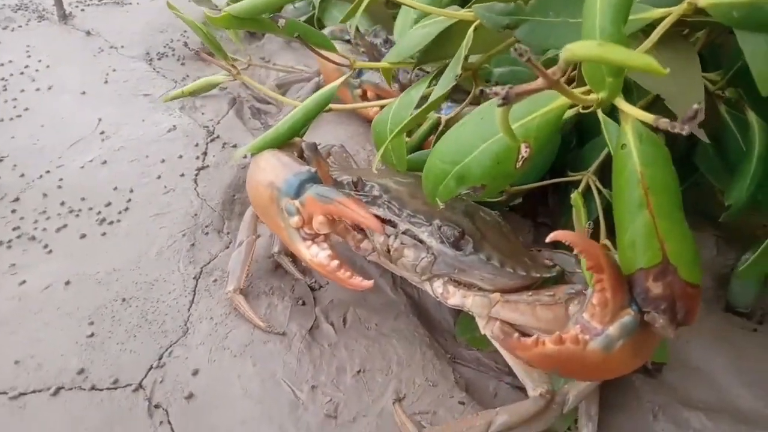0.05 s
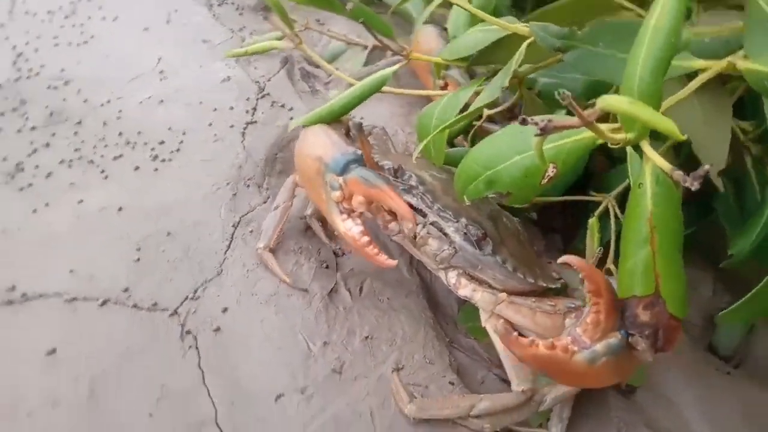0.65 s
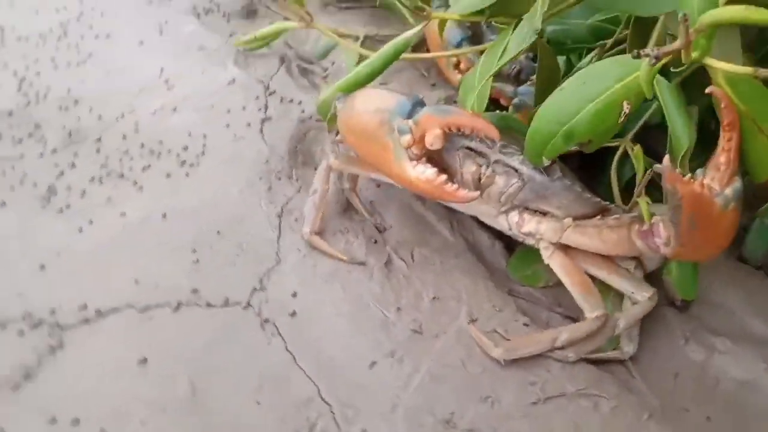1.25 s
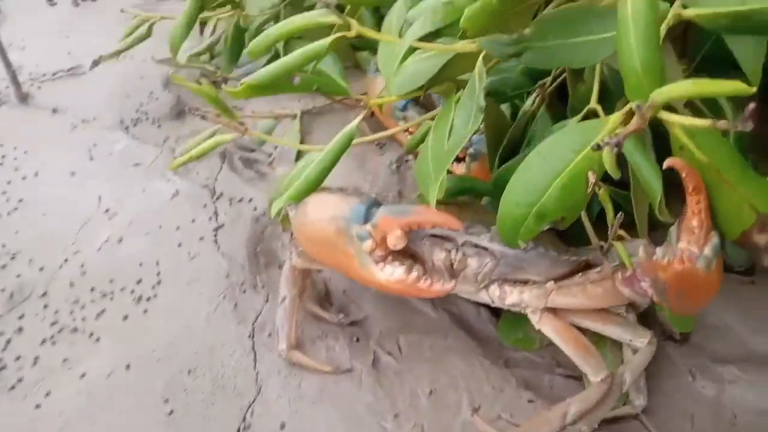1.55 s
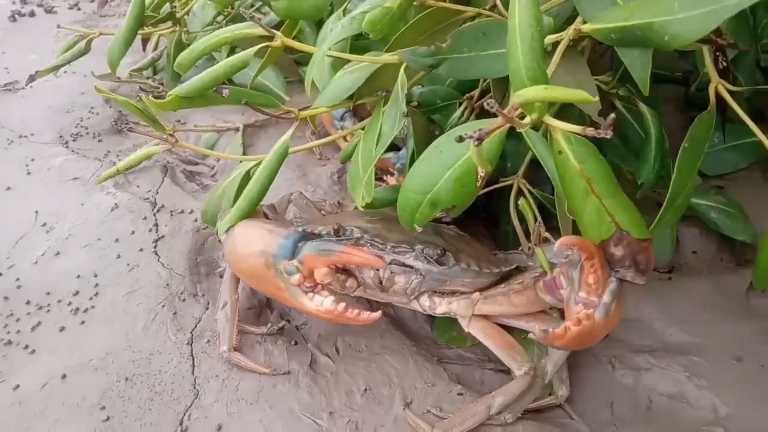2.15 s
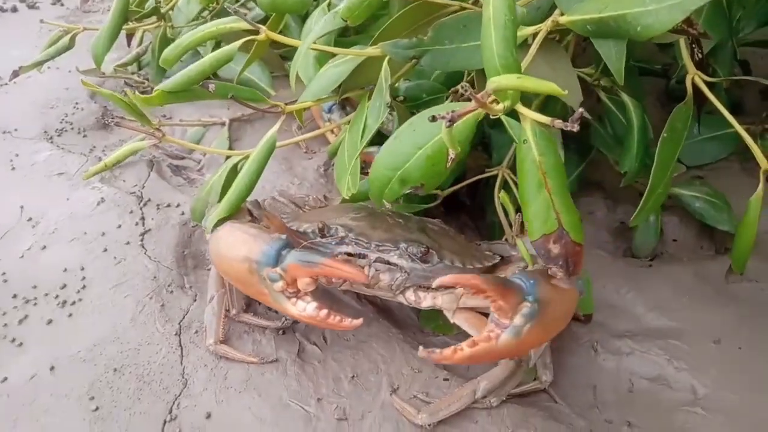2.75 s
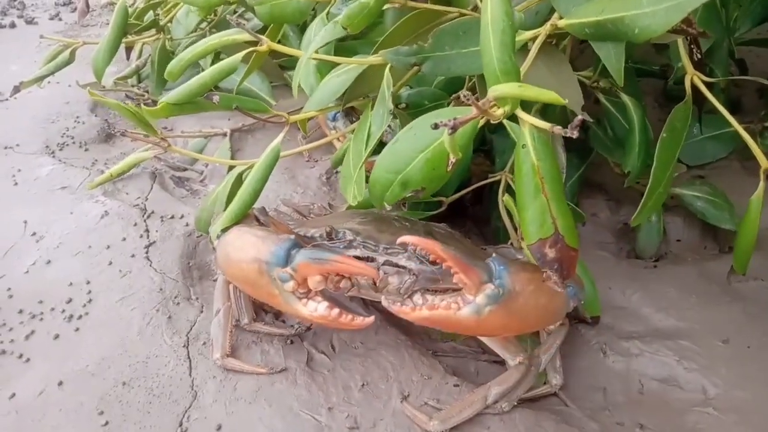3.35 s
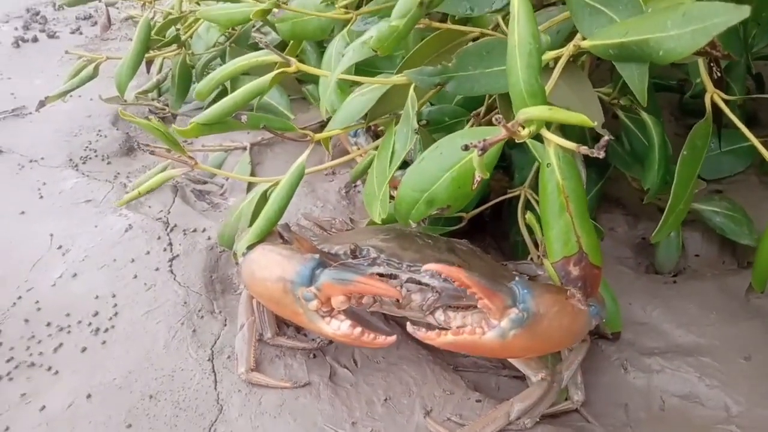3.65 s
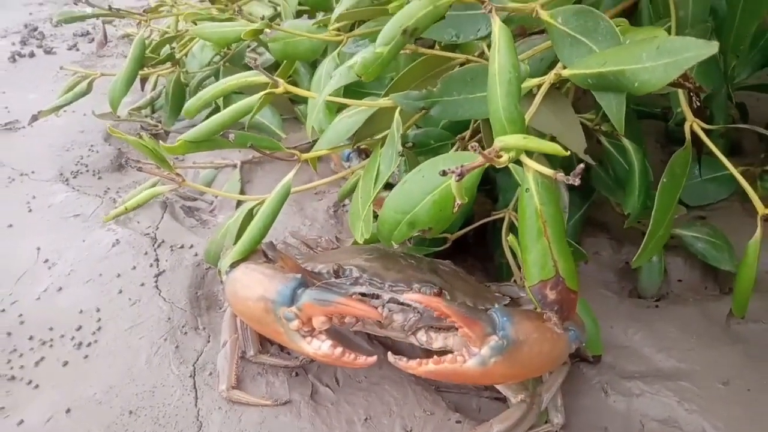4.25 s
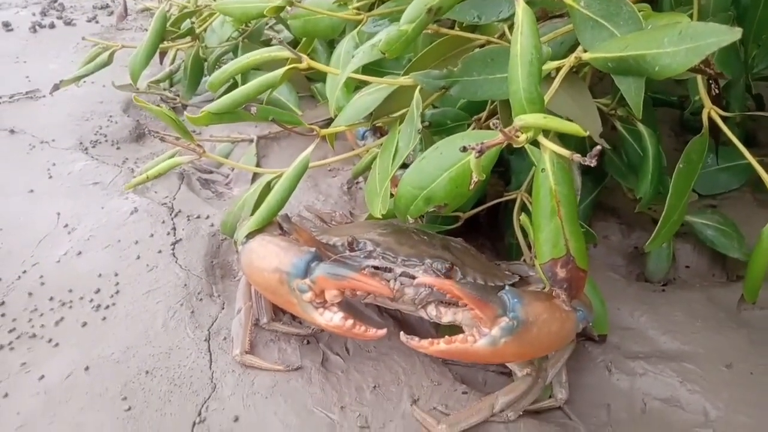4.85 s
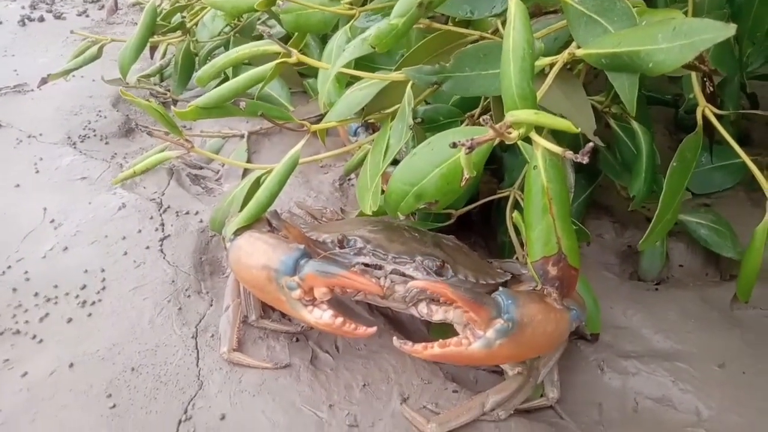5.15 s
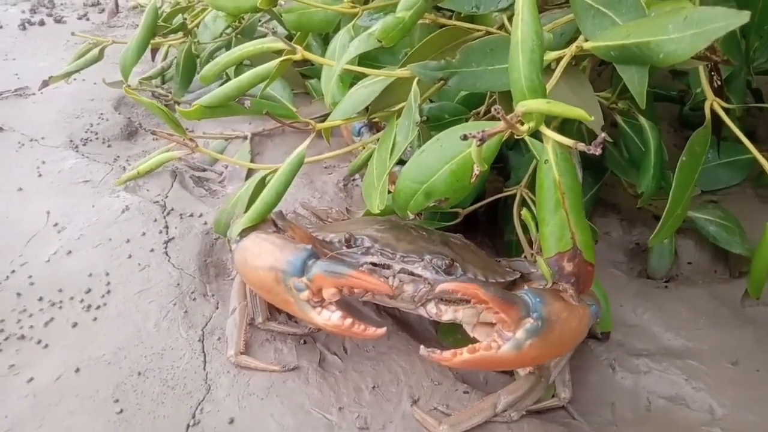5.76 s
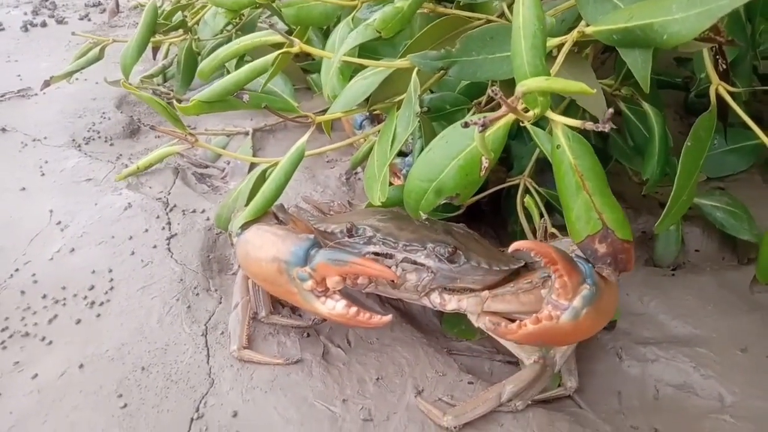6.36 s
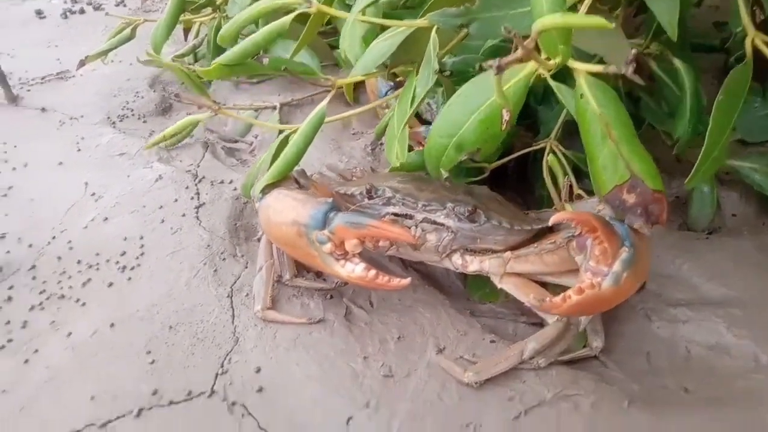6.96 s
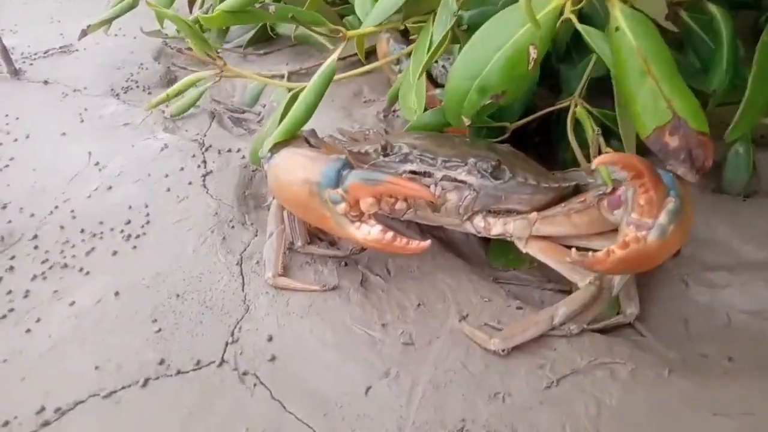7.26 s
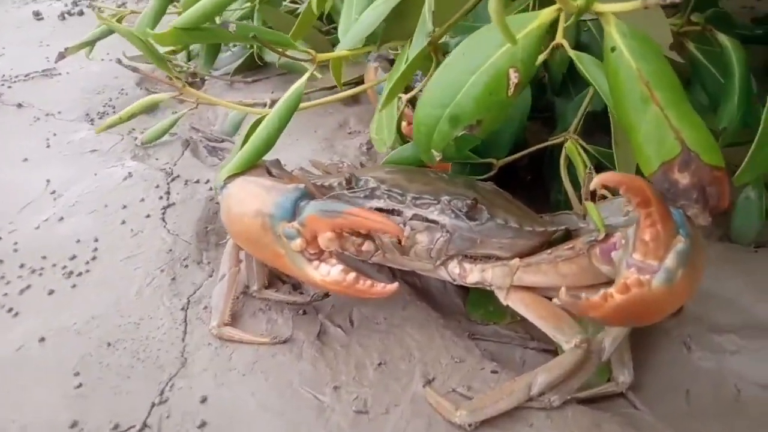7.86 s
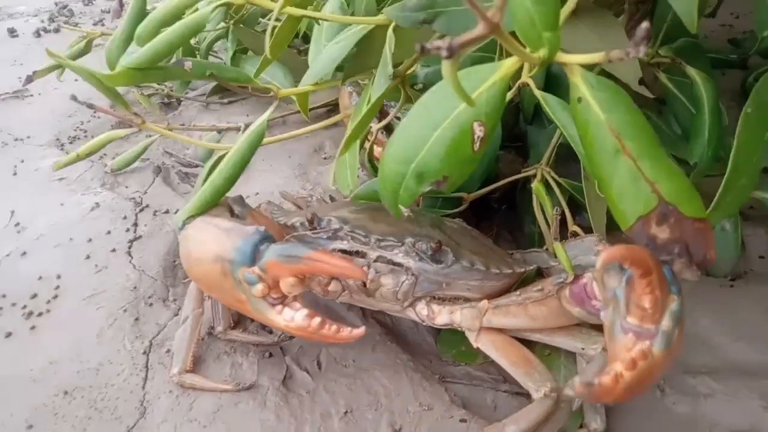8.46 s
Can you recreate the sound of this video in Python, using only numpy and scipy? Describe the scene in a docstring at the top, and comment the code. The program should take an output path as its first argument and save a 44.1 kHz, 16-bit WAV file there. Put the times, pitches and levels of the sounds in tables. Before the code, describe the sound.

Soft rustling of leaves and dry clicks of a crab's shell open over a very faint outdoor hush. The rustle soon dies down, leaving sparse ticks and two tiny plops in the mud. Handling noise comes through on the close microphone: dull bumps early on, rubbing from about halfway, a rough cluster of scrapes and knocks later, and a sharp bump at the finish.

```python
"""A mud crab sidles under mangrove leaves on a quiet mudflat, close to a hand-held camera.
From the start, over a faint hush and prickling mud, leaves rustle by friction on its shell, and its
legs and claws tick on impact. Fingers then bump and rub the camera's case, and a thin squeak ends the
biggest rustle. Two small plops follow. From about 4.5 s the fingers rub again by stick-slip friction,
with one heavier scrape after 7 s; the loudest bump comes just before the end."""
import sys
import numpy as np
from scipy import signal
from scipy.fft import rfft, irfft
from scipy.io import wavfile

SR = 44100
rng = np.random.default_rng(int(sys.argv[2]) if len(sys.argv) > 2 else 0)


def output_pcm(signal):
    """Save a mono or channel-first signal as 16-bit PCM at the path in sys.argv[1].

    Samples are clipped to [-1, 1] before scaling.
    """
    pcm = np.clip(np.atleast_2d(signal).T, -1, 1) * 32767
    wavfile.write(sys.argv[1], SR, np.round(pcm).astype(np.int16))


N = 375732
TIME = np.arange(N) / SR


def gain_of(db):
    """Converts a level in decibels to an amplitude ratio."""
    return 10 ** (np.asarray(db) / 20)


def unit_rms(x):
    """Normalises a signal to an rms of one."""
    return x / np.sqrt(np.mean(x ** 2) + 1e-20)


def follow(rows, column=1):
    """Linear interpolation of one column over time."""
    rows = np.array(rows)
    return np.interp(TIME, rows[:, 0], rows[:, column])


def add(mix, start_s, sound):
    """Superposition: sums a sound into the mix at a given time."""
    part = mix[max(round(start_s * SR), 0):][:len(sound)]
    part += sound[:len(part)]


def butterworth(x, cutoff_hz, side):
    """Third-order low-pass or high-pass filter."""
    return signal.sosfilt(signal.butter(3, cutoff_hz, side, fs=SR, output="sos"), x)


def coloured(x, spectrum):
    """Minimum-phase filtering: imposes a spectrum at unit rms, while clicks keep their sharp fronts."""
    hz, db = np.transpose(spectrum)
    bin_hz = abs(np.fft.fftfreq(4096, 1 / SR))
    log_gain = np.log(gain_of(np.interp(np.log(bin_hz + 1), np.log(hz), db)))
    taps = np.fft.ifft(np.exp(np.conj(signal.hilbert(log_gain)))).real
    return unit_rms(signal.oaconvolve(x, taps[:len(taps) // 2])[:N])


def resonate(x, hz, widths_hz):
    """Damped resonators in series, one per bandwidth, at a steady or gliding frequency; unit rms."""
    phasor = np.exp(2j * np.pi * np.cumsum(hz * np.ones(len(x))) / SR)
    for width_hz in widths_hz:
        pole = np.exp(-np.pi * width_hz / SR)
        x = 2 * (phasor * signal.lfilter([1 - pole], [1, -pole], x / phasor + 1e-18)).real
    return unit_rms(x)


def wander(rate_hz):
    """Slow random modulation: low-pass noise of unit rms."""
    hz = np.fft.rfftfreq(2 ** 19, 1 / SR)
    spectrum = rfft(rng.standard_normal(2 ** 19)) / (1 + (hz / rate_hz) ** 4)
    return unit_rms(irfft(spectrum)[:N])


def impulses(per_s, spread_db):
    """A Poisson process of tiny releases, a few much larger than the rest."""
    size = gain_of(spread_db * np.minimum(rng.exponential(1, N), 4))
    return unit_rms(size * rng.choice([-1, 1], N) * (rng.random(N) < per_s / SR))


def contact_level(rows, column, rest_db, swell_curve, fade_curve):
    """Level [dB] of arched swells adding in power to a resting level; higher curves sharpen the arch."""
    power = gain_of(rest_db) ** 2 * np.ones(N)
    for row in rows:
        start, swell_s, fade_s = row[:3]
        rise = np.sin(np.pi / 2 * np.arange(0, swell_s, 1 / SR) / swell_s) ** swell_curve
        fall = abs(np.cos(np.pi / 2 * np.arange(0, fade_s, 1 / SR) / fade_s)) ** fade_curve
        add(power, start, (gain_of(row[column]) * np.concatenate([rise, fall])) ** 2)
    return 10 * np.log10(power)


# Spectrum of the open air: (frequency [Hz], relative level [dB])
AIR_SPECTRUM = [(25, -22), (50, 4.5), (90, 3), (150, 2.5), (300, -2.5), (600, -8.5), (1200, -9.5),
                (2400, -10.5), (3700, -29.5), (5000, -24.5), (6800, -25), (8600, -21), (11000, -25),
                (15500, -30.5)]


def hush(level_db=-70.5):
    """Ambient noise: distant open air, broadband and almost stationary."""
    return gain_of(level_db + 0.24 * wander(rate_hz=1)) * coloured(rng.standard_normal(N), AIR_SPECTRUM)


# Plops in the mud: (time [s], level before the treble rolloff [dB], frequency [Hz], rise time [s])
PLOPS = [(2.435, -60, 1050, 0.0034), (2.832, -64, 428, 0.014)]


def mud(prickle_hz=8800):
    """Shot noise: wet mud prickles with clusters of faint pops; each plop is a damped oscillation."""
    t = np.arange(SR // 8) / SR
    pop = rng.standard_normal(len(t)) * np.exp(-t / .0025)
    clusters = gain_of(3.2 * wander(rate_hz=9))
    pops = signal.oaconvolve(impulses(per_s=85, spread_db=4.5) * clusters, pop)[:N]
    out = gain_of(-80) * resonate(pops, prickle_hz, widths_hz=(15000, 15000))
    for start, db, hz, rise_s in PLOPS:
        envelope = (t / rise_s * np.exp(1 - t / rise_s)) ** 2
        add(out, start, gain_of(db) * envelope * np.sin(2 * np.pi * hz * t))
    return out


# Spectrum of leaf friction: (frequency [Hz], relative level [dB])
LEAF_SPECTRUM = [(500, -22.5), (1200, -12.5), (2100, -5.5), (2600, -2.5), (3300, -1.5), (3900, -2),
                 (4900, -10.5), (6800, -13), (8200, -13), (9300, -17.5), (11000, -15), (15500, -30.5)]
# Leaves sweeping over the shell:
# (start [s], swell [s], fade [s], rustle level [dB], sizzle level [dB], rasp frequency [Hz])
LEAF_SWEEPS = [(0.01, 0.16, 0.42, -66.5, -75, 3250), (0.43, .49, 0.64, -52.3, -56.6, 3450),
               (0.535, 0.032, 0.04, -57.5, -58, 3300), (1.09, 0.075, 0.087, -58, -62, 3430),
               (1.22, 0.094, 0.14, -58.5, -69, 3300), (1.52, 0.12, 0.4, -67.5, -74, 2300),
               (1.74, 0.17, 0.075, -70, -72, 2320), (2.1, 0.042, 0.048, -66.5, -72, 3250),
               (2.77, 0.057, 0.16, -66.5, -79, 3400), (3.1, 0.16, 0.32, -70.5, -81, 3110),
               (4.02, 0.12, 0.24, -72, -84, 3320), (4.97, 0.036, 0.27, -69.5, -83, 3300),
               (7.2, .19, 0.22, -70, -75, 3300)]
# Leaves stirring between sweeps, settling as the crab does: (time [s], level [dB])
LEAF_STIRRING = [(0, -71), (2.5, -71.5), (3.7, -75), (5.9, -79), (8.5, -73.5)]


def leaves(narrowing=0.26, fizz_hz=8200, split_hz=4700):
    """Friction noise of leaves on shell: a light touch rasps in a narrow band; the fastest part sizzles."""
    hiss = coloured(rng.standard_normal(N), LEAF_SPECTRUM)
    slips = impulses(per_s=2600, spread_db=3.5) * gain_of(3.3 * wander(rate_hz=28))
    friction = hiss + coloured(slips, LEAF_SPECTRUM)
    body = butterworth(friction, split_hz, "low")
    treble = unit_rms(butterworth(friction, split_hz, "high"))
    rasp_hz = follow(sorted((start + swell_s, hz) for start, swell_s, *_, hz in LEAF_SWEEPS))
    rasp = resonate(rng.standard_normal(N), rasp_hz, widths_hz=(650, 710))
    fizz = resonate(rng.standard_normal(N), fizz_hz, widths_hz=(1500, 1800))
    rest_db = follow(LEAF_STIRRING)
    rustle_db = contact_level(LEAF_SWEEPS, column=3, rest_db=rest_db, swell_curve=1.37, fade_curve=1.54)
    sizzle_db = contact_level(LEAF_SWEEPS, column=4, rest_db=rest_db - 8, swell_curve=2, fade_curve=3.6)
    firmness_db = rustle_db - rustle_db.mean()
    rustle = gain_of(rustle_db) * unit_rms(body + gain_of(-narrowing * firmness_db) * rasp)
    sizzle = gain_of(sizzle_db) * unit_rms(treble + gain_of(-5) * fizz)
    flutter_db = .8 * wander(rate_hz=35)
    return gain_of(flutter_db) * (rustle + sizzle)


# Spectrum of a dry crack: (frequency [Hz], relative level [dB])
CRACK_SPECTRUM = [(300, 0), (900, 4), (1600, 6.5), (3700, 9), (5200, -2), (7000, 4), (10000, -27),
                  (15000, -40.5)]
# Shell striking stems, leaves and mud: (time [s], peak level before the treble rolloff [dB],
# ring frequency [Hz], 60 dB decay time [s], ring re crack [dB], snap re crack [dB])
SHELL_TICKS = [(0.043, -50, 3240, .05, 4, 2), (0.12, -48.5, 2270, 0.027, 0, -3.5),
               (0.408, -51, 3530, 0.042, -7, -5), (0.547, -53.5, 3400, 0.092, -12, 3),
               (0.5721, -41, 2980, 0.054, -12, -5), (0.723, -42, 3440, 0.023, 10, -10),
               (0.8104, -33, 2920, 0.019, 12.5, 4.5), (1.573, -49, 2050, .029, 1, 0),
               (1.929, -49, 3310, .06, 5, -5), (2.0165, -54, 3490, .02, -4, 1),
               (2.1414, -47.5, 3230, 0.083, 10, -19), (2.635, -49.5, 2440, 0.0071, -1, -15),
               (2.6593, -49, 3050, .013, -16, -7), (2.822, -52, 3460, .053, 6, -9),
               (3.5468, -58, 3780, 0.07, -1, -19), (4.211, -46.5, 2970, 0.027, -20, -9),
               (4.601, -48, 2680, 0.018, -22, -8), (4.6422, -50, 1910, 0.017, -4, -13),
               (4.702, -47.5, 1350, .019, -14, -18), (5.01, -50, 1770, 0.18, 9, -14),
               (5.1102, -46, 2820, .032, -6, 2), (5.1983, -50, 2720, 0.06, -10, -6),
               (5.603, -43, 3720, 0.016, -22, -9), (5.9501, -49.5, 1490, 0.054, -6, -7),
               (6.0082, -51, 1630, 0.019, 15, -4), (6.055, -55.5, 2670, .015, 3, -7),
               (6.602, -55, 2700, .029, 23, -6), (6.636, -47.5, 1480, 0.018, -2, -11),
               (6.7132, -48, 2830, 0.021, -10, -1), (7.1614, -48, 1870, .026, -15, -9),
               (7.192, -45, 1330, .009, 0, -6), (7.4098, -45, 4180, 0.01, 4, -15),
               (7.475, -41.5, 3560, 0.021, -8, -6), (8.1293, -39, 1720, .016, -7, -2),
               (8.1795, -53, 1410, 0.017, -2, 9), (8.2076, -41, 2480, 0.015, 15, 8),
               (8.4814, -49, 1800, 0.017, -12, -4)]


def ticks(snap_hz=9000, delay_s=.0006):
    """Impact excitation: a decaying rattle drives a dry crack, a short woody ring and a bright snap."""
    out, t = np.zeros(N), np.arange(SR // 12) / SR
    for start, db, hz, t60, ring_db, snap_db in SHELL_TICKS:
        rattle = rng.standard_normal(len(t)) * gain_of(-60 * t / t60)
        rattle[0] += 5  # sharp front of the impact
        crack = unit_rms(coloured(rattle, CRACK_SPECTRUM)[:len(t)])
        ring = resonate(rattle, hz, widths_hz=(610, 1800))
        snap = resonate(rattle, snap_hz, widths_hz=(4500, 4500))
        tick = crack + gain_of(ring_db) * ring + gain_of(snap_db) * snap
        add(out, start + delay_s, gain_of(db) * tick / abs(tick).max())
    return out


def legs(t60=.014, clustering_db=2.5):
    """Random impacts: leg tips scratch out faint dry ticks in loose groups."""
    t = np.arange(SR // 30) / SR
    rattle = rng.standard_normal(len(t)) * gain_of(-60 * t / t60)
    touches = impulses(per_s=18, spread_db=2.0) * gain_of(clustering_db * wander(rate_hz=3.2))
    return gain_of(-83) * coloured(signal.oaconvolve(touches, rattle)[:N], CRACK_SPECTRUM)


def soften_clicks(x, cutoff_hz=12500):
    """Low-pass filtering: the microphone's treble rolloff takes the sharpest edge off the clicks."""
    return butterworth(x, cutoff_hz, "low")


def push(rise_ms, rounding=1.57):
    """A one-sided force pulse: the softer the contact, the slower its rise and the rounder its shape."""
    u = np.arange(SR // 16) * 1000 / SR / rise_ms
    return -(u * np.exp(1 - u)) ** (2 + rounding * rise_ms)


def case(force, ring_db=-20, body_db=-20, body_hz=224, port_hz=3600):
    """Forced response: the case passes no steady pressure; its body and microphone port ring briefly."""
    swing = butterworth(force, cutoff_hz=86, side="high")
    body = signal.lfilter(*signal.iirpeak(body_hz, Q=body_hz / 45, fs=SR), swing)
    port = signal.lfilter(*signal.iirpeak(port_hz, Q=port_hz / 700, fs=SR), swing)
    return swing + gain_of(body_db) * body + gain_of(ring_db) * port


# Fingers bumping the case: (time [s], peak level [dB], force rise time [ms], port ring gain [dB])
FINGER_BUMPS = [(0.316, -57.5, 2.5, -14), (0.792, -44, 3.1, -10), (0.887, -48.5, 2.3, -14),
                (0.97, -51.5, 2.8, -15), (1.1412, -35, 0.63, -8.5), (1.15, -22, 0.19, 12.5),
                (1.161, -40, 1, -15.5), (1.2985, -30.5, 0.56, 15), (1.341, -49.5, 6.2, -10),
                (2.717, -45.5, 2.1, -20), (3.3808, -42.5, 1.7, -10), (3.938, -55, 2.5, -18),
                (4.079, -41.5, 6.9, -20), (4.123, -45.5, 5.4, -20), (4.257, -52, 0.54, -15),
                (4.4531, -44, 0.43, -15), (4.703, -40.5, 0.22, -2), (5.1659, -21, 1.1, -13),
                (5.474, -48, 3.3, -20), (6.815, -43, 0.46, -15), (6.9077, -30.5, 1.3, -20),
                (6.958, -37.5, 0.48, -15), (7.2418, -22.5, .17, -28), (7.2848, -34, 0.27, -12),
                (7.3207, -28, 0.22, -16), (7.345, -34, .16, -10), (7.3628, -22.5, 0.41, -14),
                (7.377, -24.5, .1, 5), (7.3824, -25.5, 0.21, -14), (7.419, -33, 0.12, -8),
                (7.431, -30, 0.9, -14), (7.4474, -29, 0.4, -14), (7.8231, -47, 0.16, -10),
                (7.9714, -35.5, .55, -10), (8.0275, -34, 0.08, -26), (8.2082, -38, 0.15, -24),
                (8.3011, -39.5, 1.04, -21), (8.4213, -8.5, .17, 8.5), (8.49, -41, 0.29, -10)]


def bumps():
    """Transient response of the case to single finger pushes: a slower rise gives a duller thud."""
    out = np.zeros(N)
    for start, db, rise_ms, ring_db in FINGER_BUMPS:
        thud = case(push(rise_ms), ring_db)
        add(out, start, gain_of(db) * thud / abs(thud).max())
    return out


# The holding hand, never quite still: (time [s], relative level [dB])
HAND_UNREST = [(0, -71), (.5, -67.5), (1.3, -65), (1.7, -78), (3.6, -76.5), (4.15, -61.5), (4.6, -66),
               (4.9, -73), (5.9, -79), (6.7, -76.5), (7.6, -65.5), (8.2, -69.5), (8.5, -59)]
# Finger strokes on the case:
# (start [s], swell [s], fade [s], relative grip level [dB], relative sliding level [dB])
FINGER_STROKES = [(0.57, .04, 0.052, -54, -76), (0.65, 0.24, 0.82, -62, -74), (1.1, 0.033, .06, -54, -65),
                  (4.1, 0.21, .25, -80, -74.5), (4.445, 0.021, 0.14, -53.5, -59.5),
                  (4.58, .13, .12, -54, -66.5), (4.98, 0.058, 0.13, -55, -59), (5.03, 0.14, 0.11, -63, -62),
                  (5.26, 0.069, 0.064, -57.5, -59), (5.33, .11, 0.098, -55, -55),
                  (6.81, 0.018, 0.15, -68, -64.5), (6.908, 0.013, .11, -53, -58.5),
                  (7.1, 0.033, 0.1, -51.5, -62), (7.24, 0.069, 0.081, -41, -55),
                  (7.34, 0.086, .06, -36, -47.5), (7.368, 0.015, 0.051, -41, -43),
                  (7.45, 0.033, 0.11, -46.5, -55.5), (7.79, 0.027, 0.039, -60, -75),
                  (7.9, 0.039, 0.35, -60, -70)]


def grip(firm_db=-45, hardening=0.22):
    """Stick-slip friction of a dragging finger: soft pushes give way to hard ones as the grip firms."""
    soft = signal.oaconvolve(impulses(per_s=310, spread_db=2.5), push(rise_ms=5.6))[:N]
    hard = signal.oaconvolve(impulses(per_s=500, spread_db=3.0), push(rise_ms=0.66))[:N]
    rest_db = follow(HAND_UNREST)
    level_db = contact_level(FINGER_STROKES, column=3, rest_db=rest_db, swell_curve=1.05, fade_curve=1.7)
    hardness = gain_of(hardening * (level_db - firm_db) - 2)
    drag = unit_rms(case(soft)) + hardness * unit_rms(case(hard, body_db=2.5))
    return gain_of(level_db - 1.57) * drag / np.hypot(1, hardness)


# Spectrum of skin friction: (frequency [Hz], relative level [dB])
SKIN_SPECTRUM = [(150, -17), (300, 6.5), (700, -2.5), (1300, -5.5), (1900, -9), (3400, -15.5),
                 (5000, -28.5), (9000, -26), (15000, -44)]
# Resonance of rubbed skin, shifting with the grip: (time [s], frequency [Hz], level re grain [dB])
SKIN_RESONANCE = [(4.45, 600, -2), (5.03, 700, -13), (5.1, 670, 13), (5.16, 606, -11), (5.31, 815, 6.5),
                  (5.42, 845, 3), (5.5, 860, 5), (6.9, 650, -21), (7.4, 760, -13)]


def sliding():
    """Sliding friction of skin on the case: a grain of fine slips plus a hollow, moving resonance."""
    grain = coloured(impulses(per_s=2500, spread_db=4.5), SKIN_SPECTRUM)
    hollow = resonate(rng.standard_normal(N), follow(SKIN_RESONANCE), widths_hz=(340, 950))
    strength = gain_of(follow(SKIN_RESONANCE, column=2))
    level_db = contact_level(FINGER_STROKES, column=4, rest_db=-79, swell_curve=0.96, fade_curve=1.3)
    return gain_of(level_db + 2) * (grain + strength * hollow) / np.hypot(1, strength)


def squeak(start_s=1.245, length_s=0.14, level_db=-83, crest_hz=14550, glide_hz=550):
    """Narrow-band noise is heard as a pitch: a thin squeak arches over the end of the big rustle."""
    arch = np.sin(np.pi * np.arange(0, length_s, 1 / SR) / length_s)
    hz = crest_hz - glide_hz * (1 - arch)
    tone = resonate(rng.standard_normal(len(hz)), hz, widths_hz=(260, 260))
    out = np.zeros(N)
    add(out, start_s, gain_of(level_db) * np.sqrt(arch) * tone)
    return out


def scene():
    """Free-field superposition: the sources sum in one channel, with no echo."""
    air = hush()
    clicks = soften_clicks(mud() + ticks() + legs())
    return (air + clicks + leaves() + squeak() + bumps() + grip() + sliding())[None]


def record(dry, cutoff_hz=15600):
    """Band limiting: a steep linear-phase low-pass filter removes the highest treble."""
    taps = signal.firwin(511, cutoff_hz, window=("kaiser", 9), fs=SR)
    return signal.oaconvolve(dry, taps[None], "same")


dry = scene()
out = record(dry)
output_pcm(out)
```